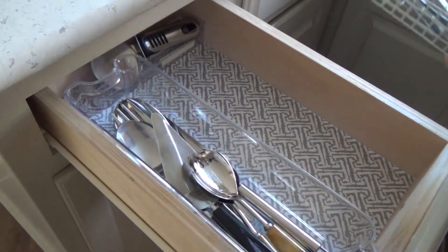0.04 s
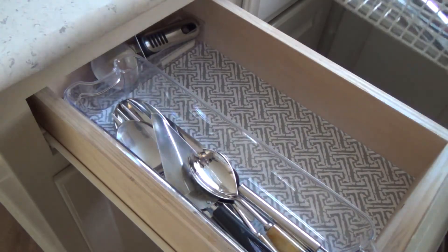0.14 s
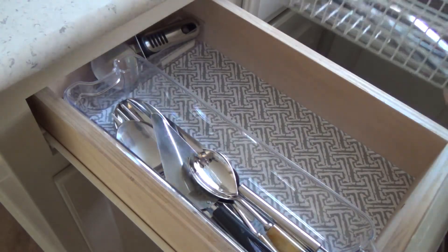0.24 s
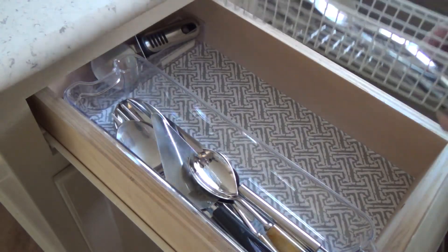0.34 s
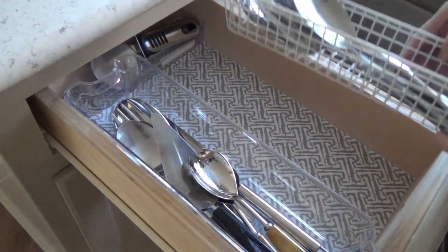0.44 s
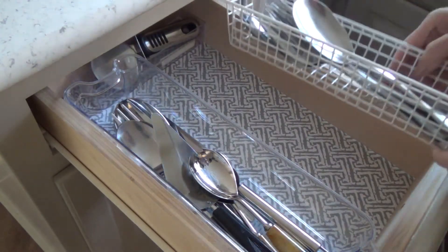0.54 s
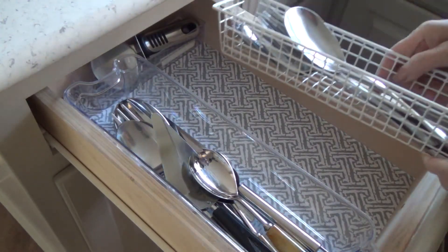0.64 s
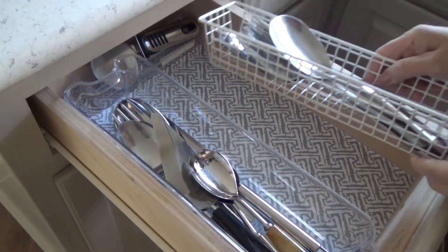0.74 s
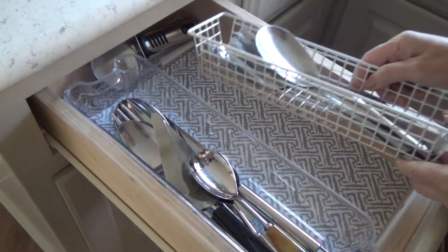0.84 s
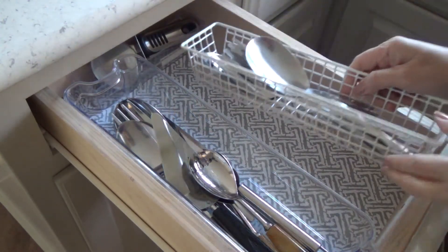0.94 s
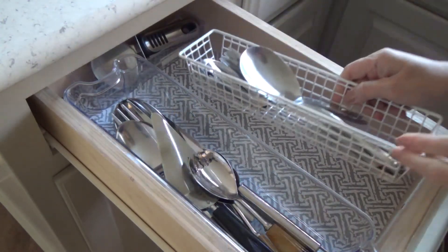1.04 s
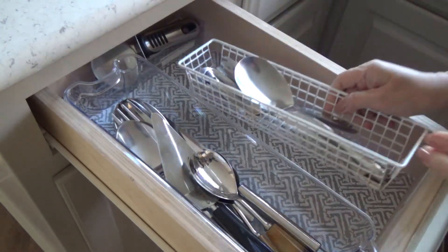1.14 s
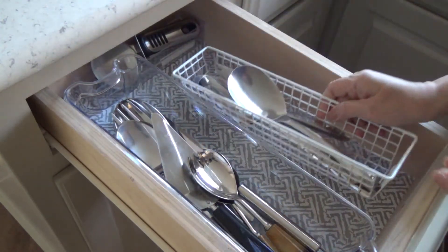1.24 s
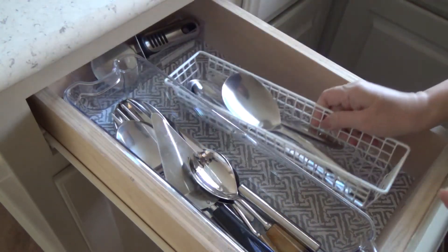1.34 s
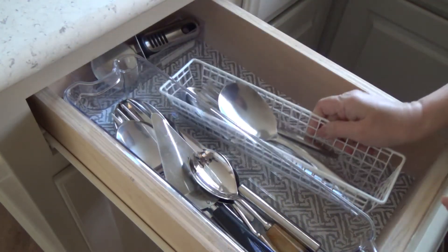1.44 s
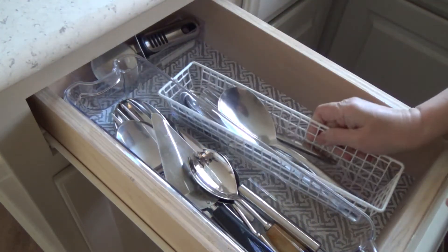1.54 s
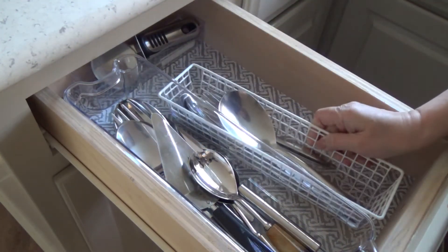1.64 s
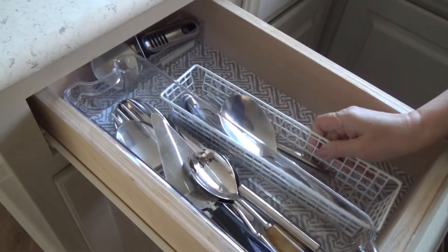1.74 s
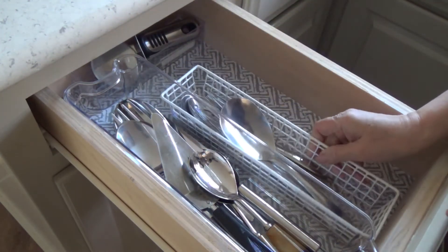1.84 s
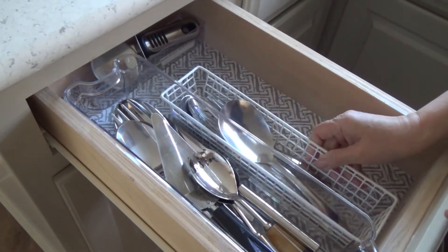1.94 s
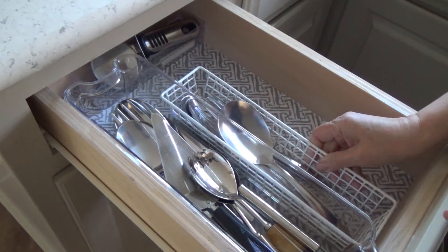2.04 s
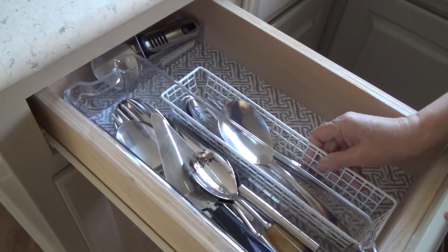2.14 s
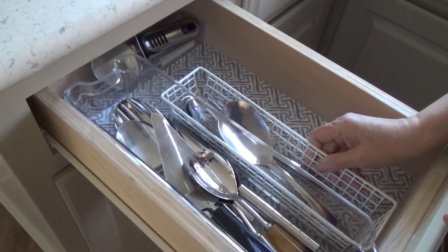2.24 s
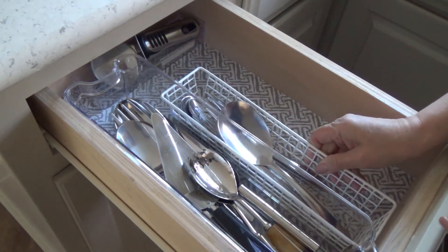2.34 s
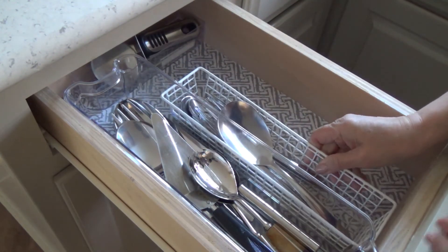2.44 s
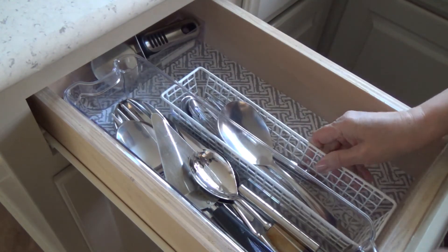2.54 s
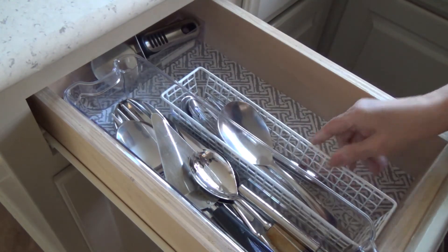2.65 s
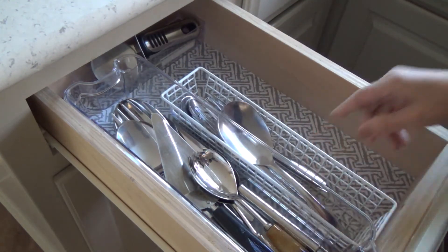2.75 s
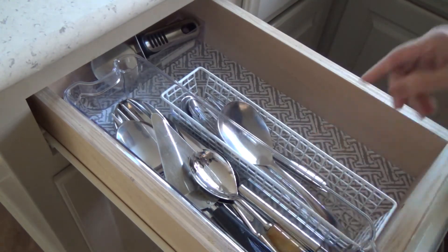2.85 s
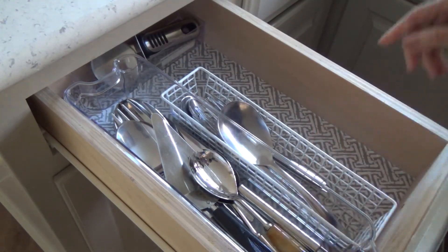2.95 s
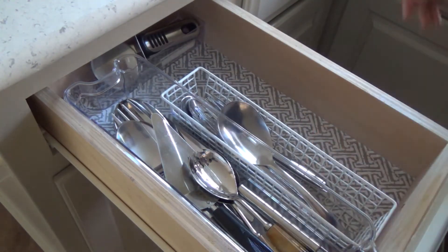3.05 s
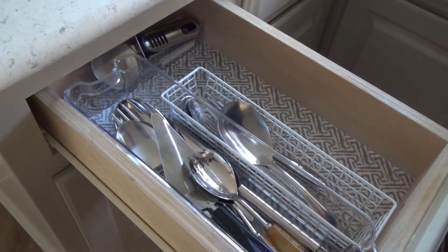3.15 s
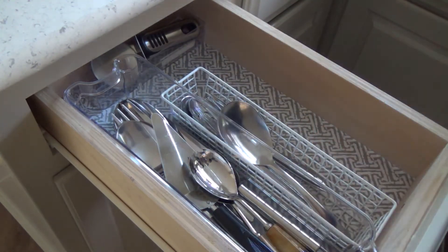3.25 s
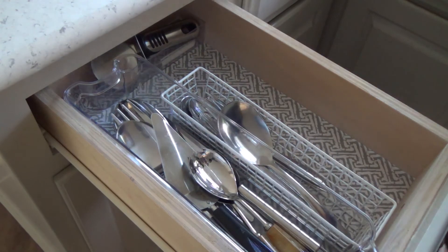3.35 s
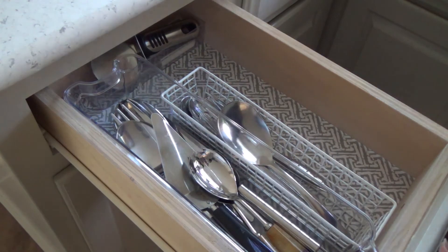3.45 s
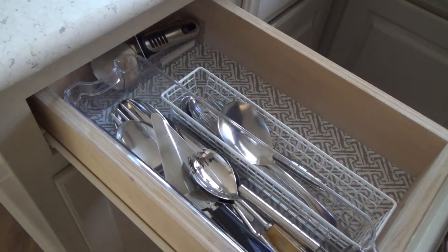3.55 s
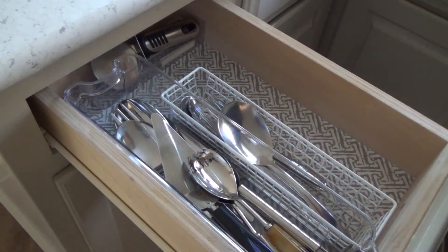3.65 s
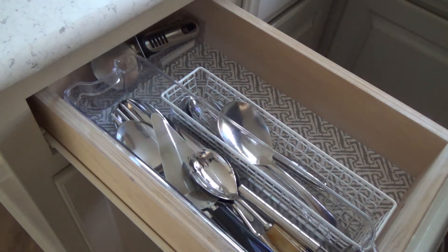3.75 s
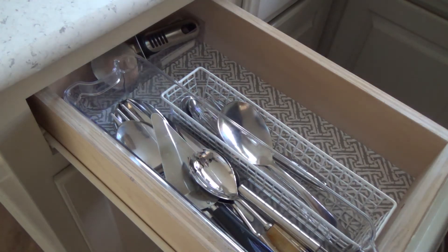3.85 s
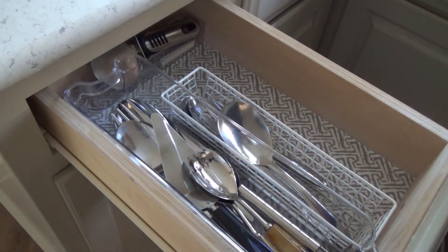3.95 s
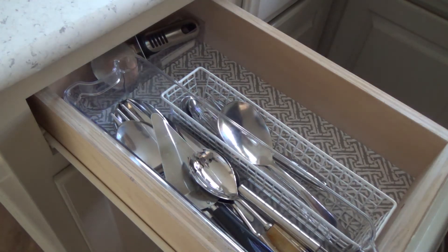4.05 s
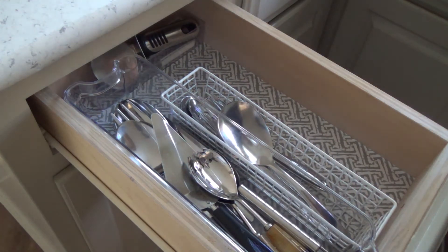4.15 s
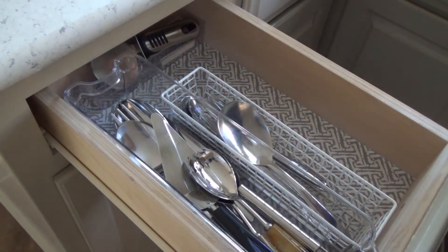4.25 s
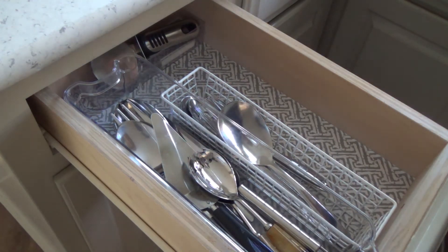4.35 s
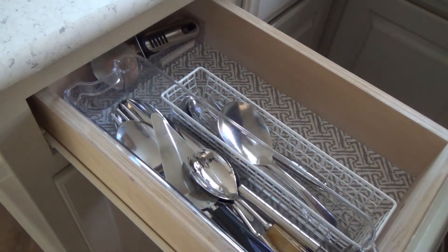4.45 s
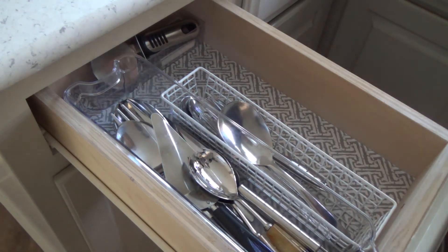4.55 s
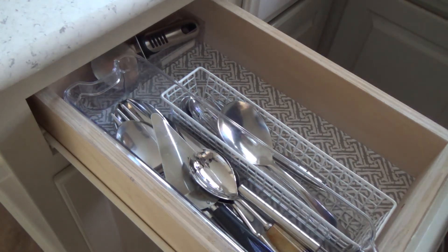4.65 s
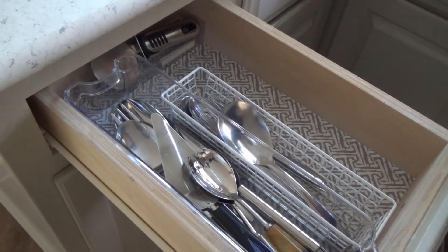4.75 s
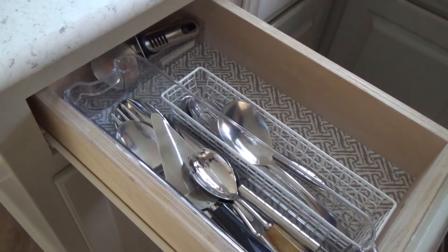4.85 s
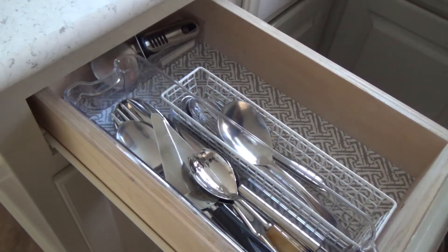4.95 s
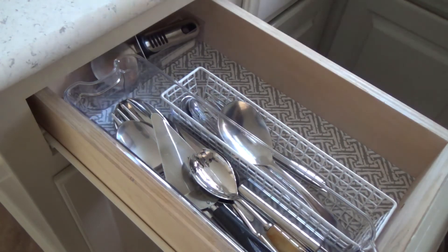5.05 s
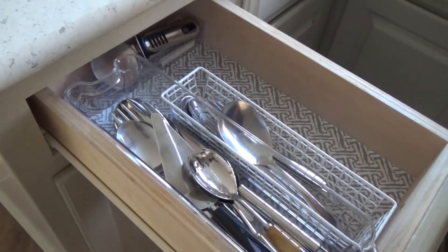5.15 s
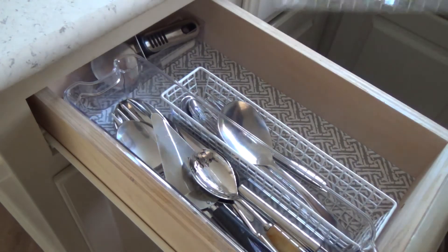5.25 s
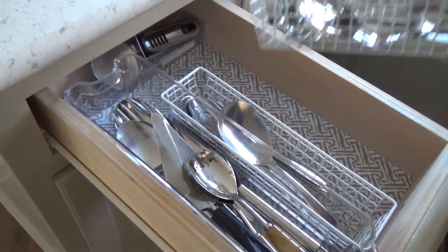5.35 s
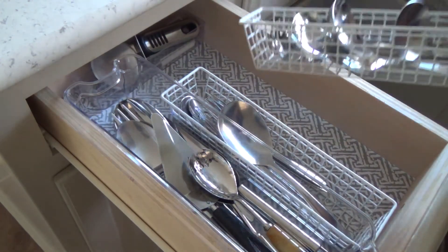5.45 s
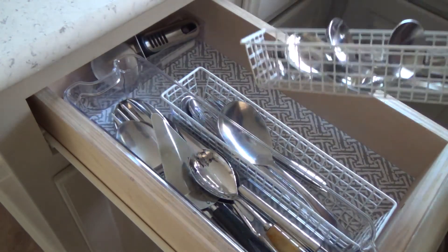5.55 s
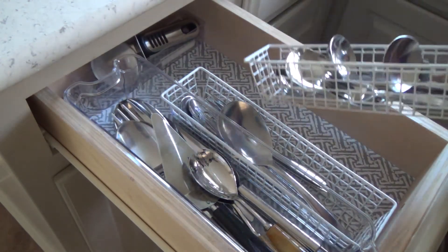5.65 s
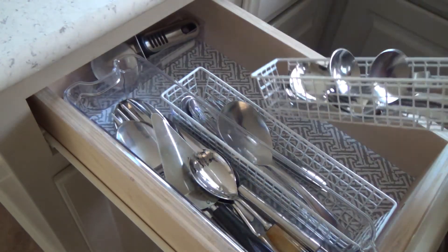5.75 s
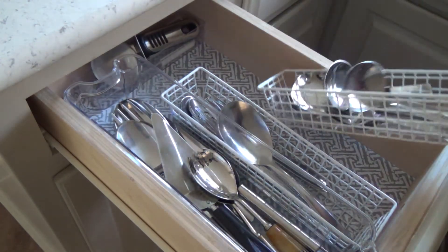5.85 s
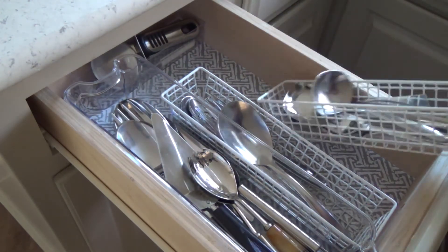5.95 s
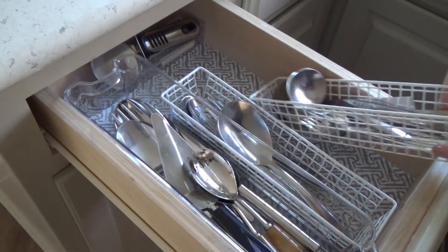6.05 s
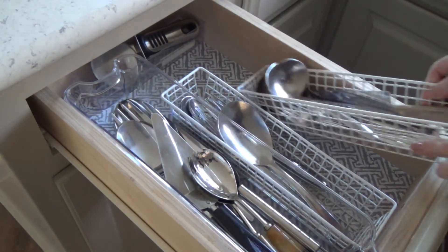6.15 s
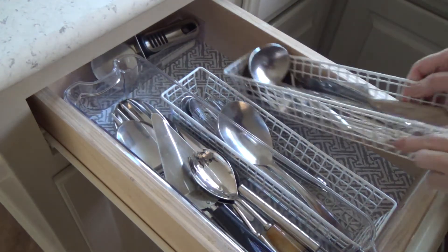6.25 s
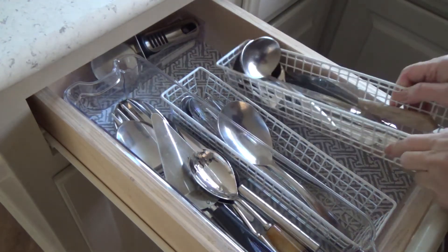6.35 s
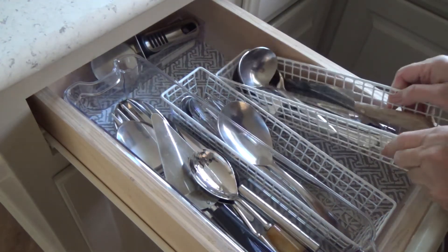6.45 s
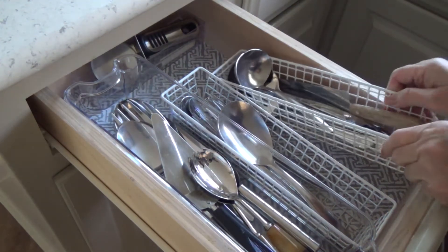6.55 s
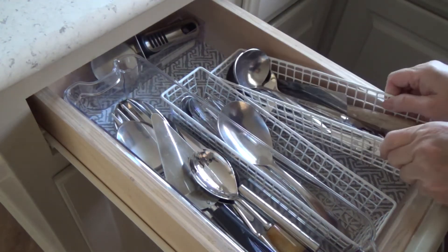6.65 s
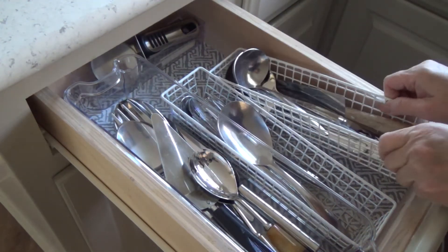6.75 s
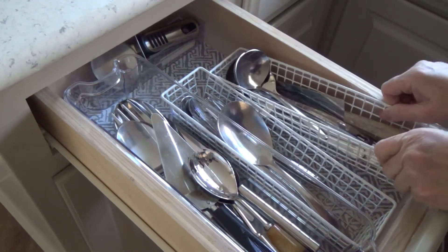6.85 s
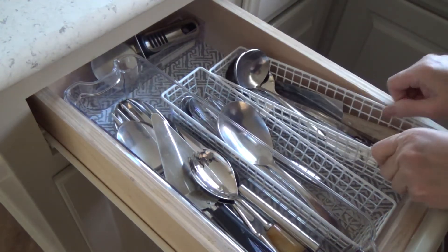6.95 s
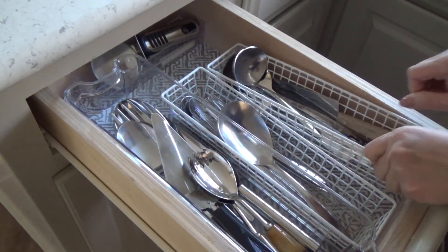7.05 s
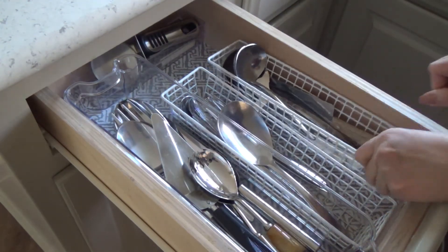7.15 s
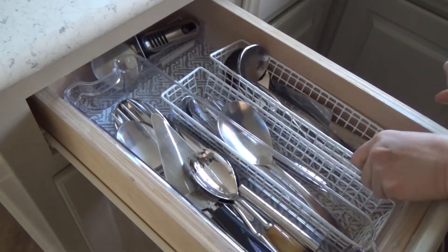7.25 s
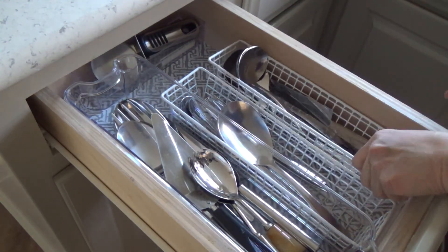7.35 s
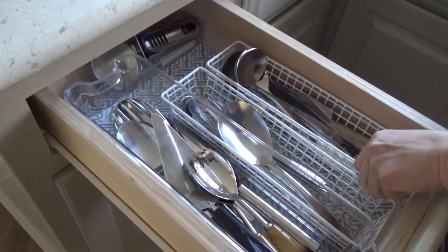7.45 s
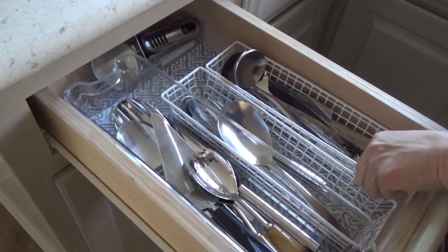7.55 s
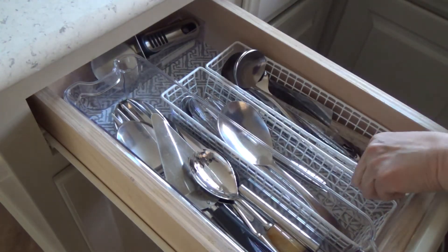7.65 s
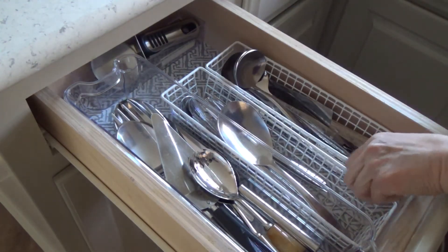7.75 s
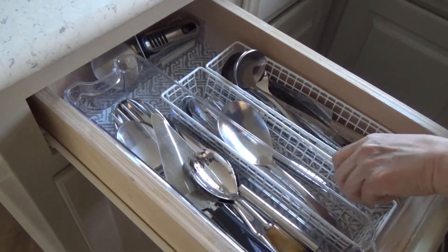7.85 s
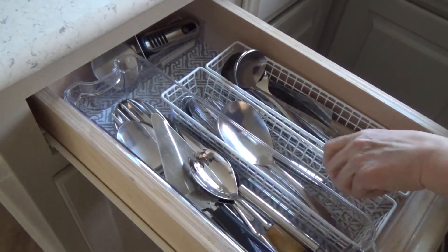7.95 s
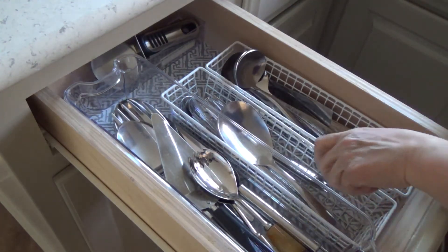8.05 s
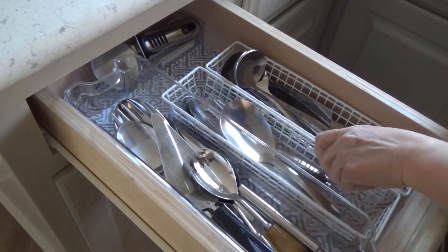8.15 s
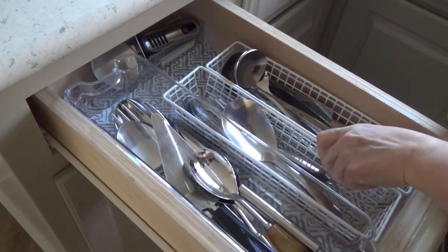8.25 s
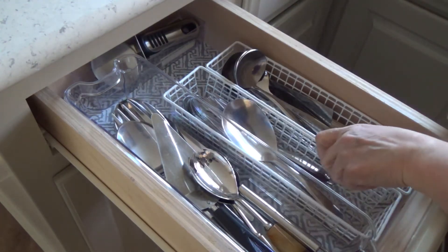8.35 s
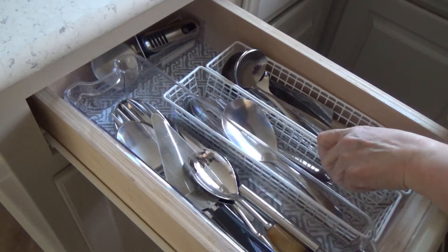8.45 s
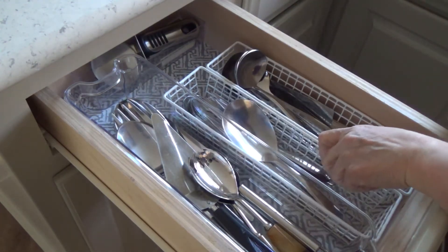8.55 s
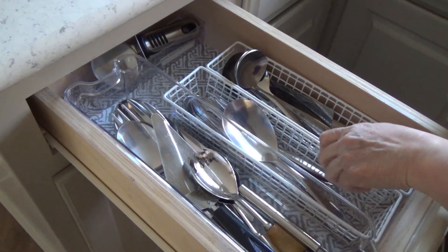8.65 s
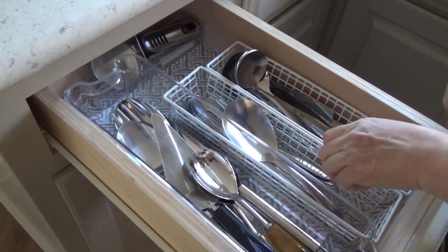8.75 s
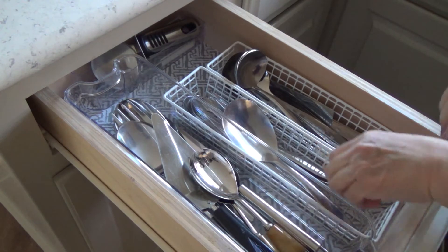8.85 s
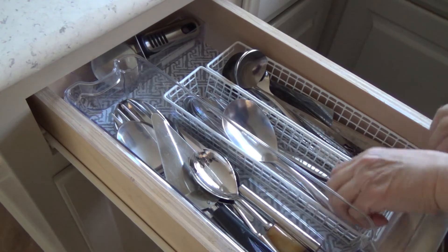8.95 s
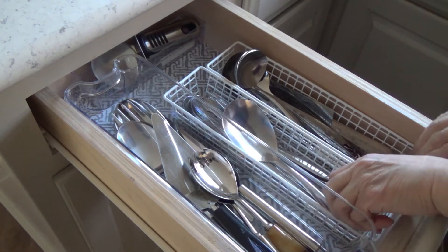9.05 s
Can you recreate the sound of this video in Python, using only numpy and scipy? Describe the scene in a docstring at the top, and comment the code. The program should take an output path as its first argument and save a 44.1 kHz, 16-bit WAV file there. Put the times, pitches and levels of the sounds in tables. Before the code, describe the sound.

Two wire baskets of steel cutlery are set into a wooden drawer with hollow knocks, bright clinks and a rattling metallic slide.

```python
"""Small kitchen: two wire baskets of steel cutlery are set into an open wooden drawer and nudged into place.
Knocks are noise cracks plus damped wood modes; clinks are random contacts driving damped steel modes.
Cutlery slides down the second basket as it tilts; wire scrapes the liner; a cupboard thuds further off.
The room answers with decaying noise tails, over a faint hiss and a thin electrical whine."""
import sys
import numpy as np
from scipy import signal
from scipy.fft import rfft, irfft, next_fast_len
from scipy.io import wavfile

SR = 44100
rng = np.random.default_rng(int(sys.argv[2]) if len(sys.argv) > 2 else 0)


def wrap_up_sound(samples):
    """Save the sound to the file named by the first command line argument, as 16-bit audio."""
    columns = np.atleast_2d(samples).T
    # keep every value between -1 and 1, then stretch to whole-number steps
    tamed = np.clip(columns, -1, 1)
    steps = np.round(tamed * 32767).astype(np.int16)
    wavfile.write(sys.argv[1], SR, steps)


N = 400869
SPAN = 32768  # samples in one short sound
MEDIUM_DB = -25  # contact strength at which the *_PER_DB rules start from their base value


def amp(db):
    """Decibels to gain."""
    return 10 ** (np.asarray(db) / 20)


def unit(x):
    """Scale to rms 1."""
    return x / np.sqrt(np.mean(x ** 2) + 1e-20)


def unit_energy(x):
    """Scale to energy 1 along the last axis."""
    return x / np.sqrt(np.sum(x ** 2, axis=-1, keepdims=True) + 1e-20)


def at_level(x, db, length_s):
    """Scale so that the first length_s has this rms level."""
    return x * amp(db) / np.sqrt(np.mean(x[:round(length_s * SR)] ** 2) + 1e-20)


def by_strength(db, value, per_db):
    """Property that changes linearly with contact strength in dB."""
    return value + per_db * (db - MEDIUM_DB)


def along(points, hz):
    """Interpolate (Hz, value) points on a log frequency axis."""
    f, v = np.transpose(points)
    return np.interp(np.log(hz + 1), np.log(f), v)


def age():
    """Seconds since the start of one short sound."""
    return np.arange(SPAN) / SR


def fade(t60_s):
    """Exponential decay by 60 dB in t60_s."""
    return np.exp(-np.log(1000) * age() / max(t60_s, 1e-3))


def burst(length_s, settle_s):
    """Full strength for length_s, then a 60 dB decay in settle_s."""
    return np.exp(-np.log(1000) * np.maximum(age() - length_s, 0) / max(settle_s, 1e-3))


def add(track, s, sound):
    """Mix a sound in at time s."""
    part = track[round(s * SR):][:len(sound)]
    part += sound[:len(part)]


def coloured(x, points):
    """Minimum-phase filter, via the folded cepstrum, with the gain of (Hz, dB) points."""
    n = x.shape[-1]
    m = 2 * next_fast_len(n // 2 + 2048)
    gain = amp(along(points, np.fft.rfftfreq(m, 1 / SR)))
    cepstrum = irfft(np.log(gain))
    cepstrum[1:m // 2] *= 2
    cepstrum[m // 2 + 1:] = 0
    return irfft(rfft(x, m) * np.exp(rfft(cepstrum)), m)[..., :n]


def ringing(modes, detune=0):
    """One damped sine per mode, its energy set by its dB; detune is the random relative pitch spread."""
    rings = []
    for hz, db, t60_s in modes:
        mode_hz = hz * (1 + detune * rng.standard_normal())
        sine = np.sin(2 * np.pi * mode_hz * age())
        rings.append(amp(db) * unit_energy(sine * fade(t60_s)))
    return np.array(rings)


def struck(rings, scatter_db):
    """Each contact point drives the modes with other strengths and signs."""
    strengths = amp(scatter_db * rng.standard_normal(len(rings)))
    signs = rng.choice([-1, 1], len(rings))
    return unit_energy((strengths * signs) @ rings)


def contacts(rate_hz, spread_db, size):
    """Random tiny collisions of mean rate rate_hz, scaled to rms 1."""
    hits = rng.random(size) < rate_hz / SR
    strengths = amp(spread_db * rng.standard_normal(size))
    return unit(hits * strengths * rng.choice([-1, 1], size))


def ports(mid, other, width):
    """Diffuse stereo at two close ports: other, filtered by width, is the side signal."""
    side = coloured(other, width)
    return np.array([mid + side, mid - side])


# hiss spectrum: (frequency [Hz], relative density [dB per Hz])
HISS = [(20, -17.5), (50, -3), (110, 2), (300, 3.5), (500, -1), (1000, -1.5), (2000, -5), (4000, -7.5),
        (8000, -10), (14000, -11.5)]
# hiss stereo width: (frequency [Hz], side re mid [dB])
HISS_WIDTH = [(60, 0), (180, -7), (550, -8.5), (1650, -18.5), (4970, -30.5), (15000, -24.5)]


def background(hiss_db=-58.0, whine_db=-58.5, whine_hz=15735, throb_hz=13):
    """Steady filtered noise and a high sine whose level throbs."""
    t = np.arange(N) / SR
    hiss = unit(ports(*coloured(rng.standard_normal((2, N)), HISS), HISS_WIDTH))
    tone = np.sqrt(2) * np.sin(2 * np.pi * whine_hz * t)
    throb = 1 - .35 * np.cos(2 * np.pi * throb_hz * t)
    return amp(hiss_db) * hiss + amp(whine_db) * tone * throb


# reverberation time: (frequency [Hz], t60 [s])
ROOM_DECAY = [(100, 0.45), (260, 0.41), (700, 0.5), (1840, 0.55), (4850, 0.34), (12800, 0.23)]
# reverberation stereo width: (frequency [Hz], side re mid [dB])
ROOM_WIDTH = [(30, -26), (70, -9), (130, -8.5), (400, -27.5), (1500, -41), (10000, -62)]


def kitchen(x, delay_s=.005, build_s=0.0068, count=14):
    """Noise tails build up after the direct sound and die fastest in the treble; redrawn for each time slice."""
    wet = np.zeros((2, N + SPAN))
    for part in np.array_split(np.arange(N), count):
        hz, t, z = signal.stft(rng.standard_normal((2, SPAN)), SR, nperseg=256)
        decay = np.exp(-np.log(1000) * t / along(ROOM_DECAY, hz)[:, None])
        tail = signal.istft(z * decay, SR, nperseg=256)[1][:, :SPAN]
        tail = unit_energy(tail * np.clip((age() - delay_s) / build_s, 0, 1))
        answer = signal.fftconvolve(x[None, part], tail, axes=1)
        wet[:, part[0]:part[0] + answer.shape[1]] += answer
    return ports(*wet[:, :N], ROOM_WIDTH)


# cupboard bumped further off: (time [s], level [dB])
THUDS = [(3.992, -33), (4.321, -57)]
# cupboard panel spectrum: (frequency [Hz], gain [dB])
CUPBOARD = [(50, -32), (110, -4), (250, -2), (450, 0), (700, -4), (1150, -8), (1900, -20), (3000, -28),
            (6000, -48), (12000, -80)]


def cupboard(rise_s=.002, ring_t60_s=.09, head_s=.02):
    """Dull wooden thud: decaying noise with the treble filtered off."""
    track = np.zeros(N)
    for s, db in THUDS:
        panel = rng.standard_normal(SPAN) * fade(ring_t60_s) * (1 - np.exp(-age() / rise_s))
        add(track, s, at_level(coloured(panel, CUPBOARD), db, head_s))
    return track


# wire dragged over the drawer liner: (time [s], level [dB], length [s])
SCRAPES = [(1.28, -51, .04), (1.63, -46, .07), (5.928, -37, .016), (6.42, -42, .012), (6.58, -39, .04),
           (6.916, -53, .036), (7.28, -38, .022), (8.063, -51.5, .06), (8.175, -44.5, .055)]
DRAG_RISE_SHARE, DRAG_SETTLE_S = .3, .22  # rise as a share of drag length
# wire shudders under the thrown load
SHUDDER_DELAY_S, SHUDDER_RISE_S, SHUDDER_S, SHUDDER_SETTLE_S = .01, .002, .02, .38
SHUDDER_DB, SHUDDER_PER_DB = -37.5, 1.5


def scrapes(rings):
    """Dragged or shuddering wire catches and slips on the liner; the slips drive the drawer bottom."""
    track = np.zeros(N)
    drags = [(s, db, DRAG_RISE_SHARE * length_s, length_s, DRAG_SETTLE_S) for s, db, length_s in SCRAPES]
    shudders = []
    for s, db, _ in throws():
        level_db = by_strength(db, SHUDDER_DB, SHUDDER_PER_DB)
        shudders.append((s + SHUDDER_DELAY_S, level_db, SHUDDER_RISE_S, SHUDDER_S, SHUDDER_SETTLE_S))
    rub_tone = [(70, -25.5), (190, -3), (1200, -2), (2500, -9), (5000, -11.5), (12000, -14)]  # (Hz, dB)
    for s, db, rise_s, length_s, settle_s in shudders + drags:
        envelope = burst(length_s, settle_s) * np.minimum(age() / rise_s, 1)
        slips = contacts(rate_hz=900, spread_db=2.5, size=SPAN) * envelope
        dull_noise = unit_energy(rng.standard_normal(SPAN) * fade(0.058))
        board = amp(-13) * struck(rings, scatter_db=1.5) + dull_noise
        rub = coloured(signal.fftconvolve(slips, board)[:SPAN], rub_tone)
        add(track, s, at_level(rub, db, length_s + 0.03))
    return track


# spoon and fork modes, damped by lying on each other: (frequency [Hz], relative energy [dB], t60 [s])
STEEL = [(2712, -5, 0.1), (2920, -9, 0.14), (3800, 0, 0.12), (4360, -23, 0.063), (4540, -1, 0.027),
         (4780, -1.5, 0.135), (5240, -5, 0.2), (6460, -13, 0.1184), (6930, -3.5, 0.14), (7410, -3, 0.18),
         (7730, 6.5, 0.173), (8390, 2, 0.22), (9270, -3, 0.088), (9570, 3.5, .1), (10200, -4, 0.075),
         (9870, 6, 0.053), (10700, 2, 0.22), (11200, -13.5, 0.104), (11400, -2.5, 0.082), (11440, 5, .2),
         (11600, 10, 0.09), (12393, -20, .18), (12760, 7, .14), (12370, -4, 0.037), (13500, -11, .14),
         (13550, 11, .08), (14560, 2.5, .09)]


def steel_pieces(count=6):
    """Like pieces whose modes differ a little in pitch."""
    return [ringing(STEEL, detune=.003) for _ in range(count)]


# spectrum of the crowded short modes: (frequency [Hz], gain [dB])
CLASH = [(70, -58), (400, -21), (1500, -17), (2300, -13.5), (2800, -5), (4000, -8), (6000, -3),
         (8700, -3.5), (9800, 2), (13000, 1.5), (14000, -2), (16000, -7.5)]


def utensil(pieces, ring_db=-4, tick_db=-8, clash_t60_s=0.062):
    """One piece's answer to a contact: a tick, a crowd of quickly damped modes and a few clear ones."""
    crowd = unit_energy(rng.standard_normal(SPAN) * fade(clash_t60_s))
    tick = amp(tick_db) * unit_energy(rng.standard_normal(SPAN) * fade(0.0084))
    clear = struck(pieces[rng.integers(len(pieces))], scatter_db=3)
    return unit_energy(coloured(crowd + tick, CLASH)) + amp(ring_db) * clear


def bowls(x, db):
    """Contacts also wake the low modes of the spoon bowls; thin steel radiates no bass."""
    return coloured(x, [(60, db - 31), (600, db), (2000, db), (4500, db), (9000, 0)])


# cutlery sliding down its basket: (time [s], level [dB])
SLIDE = [(5.53, -55), (5.63, -36), (5.66, -58), (5.81, -40), (5.83, -29), (5.888, -31), (5.9, -19),
         (6.16, -19.5), (6.28, -23.5), (6.36, -47)]


def slide(pieces, bowl_db=2.5, bowl_per_db=-.55, count=40):
    """Pieces skid in turn over mesh and neighbours, each ringing briefly; weaker sliding is duller."""
    s, db = np.transpose(SLIDE)
    step_s = (s[-1] - s[0]) / count
    skid = np.sin(np.pi * np.minimum(age() / (2 * step_s), 1))  # lasts two steps, so skids overlap
    track = np.zeros(N)
    for start in s[0] + step_s * np.arange(count - 1):
        hits = unit_energy(skid * contacts(rate_hz=380, spread_db=4, size=SPAN))
        force = hits * np.sqrt(step_s * SR) * amp(np.interp(start + age(), s, db))
        tone_db = by_strength(np.interp(start + step_s, s, db), bowl_db, bowl_per_db)
        piece = bowls(utensil(pieces, ring_db=-5.5, clash_t60_s=0.1), tone_db)
        add(track, start, signal.fftconvolve(force, unit_energy(piece))[:SPAN])
    return track


SETTLE_S, SETTLE_PER_DB = .072, .17  # harder jolts take longer to settle; slope in dB of time per dB
CHATTER_S, SETTLE_POWER = .01, .52  # so do those that chatter longer than CHATTER_S


def settling(db, length_s):
    """Seconds that the cutlery takes to come to rest."""
    return SETTLE_S * (length_s / CHATTER_S) ** SETTLE_POWER * amp(by_strength(db, 0, SETTLE_PER_DB))


# pieces clink as a basket is moved:
# (time [s], level [dB], chatter [s], leading tone [Hz], tone re clatter before LEAD_LIFT_DB [dB])
CLINKS = [(1.008, -45, .0045, 11600, -15), (1.038, -41.5, .008, 12400, -8), (1.05, -23.5, .0015, 11610, -5),
          (1.052, -38, .0012, 4860, 0), (1.099, -29, .012, 11560, -8), (3.898, -50, .002, 10700, -2),
          (3.968, -50.5, .002, 10400, -5), (5.002, -53, .002, 13500, -15), (5.364, -54, .002, 2950, -8),
          (5.595, -32.5, .006, 12900, -16), (5.618, -32, .007, 4600, -9), (5.665, -33, .002, 11000, -10),
          (5.734, -43, .035, 4930, -13), (5.897, -27, .014, 9300, 14), (5.979, -31, .005, 4500, -4),
          (6.018, -25, .002, 4580, -8), (6.084, -29, .025, 9800, 8), (6.198, -24, .007, 11450, -7),
          (6.241, -21, .018, 12400, -7), (6.305, -35, .003, 2950, -6), (6.376, -37, .002, 11750, -3),
          (6.4, -32.5, .0015, 11750, -18), (6.431, -19, .008, 3050, -19), (6.438, -20, .008, 2776, -17),
          (6.612, -17.5, .005, 12760, -2), (6.619, -27, .002, 5100, -8), (6.936, -36, .004, 12900, -2.5),
          (7.127, -50.5, .003, 12700, -2), (7.276, -18, .006, 11650, -10), (7.303, -28, .01, 13000, -7),
          (7.583, -28.5, .0012, 7350, -13), (7.643, -47, .028, 7350, -11.5), (8.118, -53, .003, 10200, -10),
          (8.517, -52, .009, 10200, -9), (8.709, -40, .004, 7400, -12), (9.03, -50, .015, 10200, -8)]
# thrown cutlery lands just after the knock; its tone level is also before LEAD_LIFT_DB
THROW_DELAY_S, THROW_HZ, THROW_TONE_DB = .0055, 11620, -21
LEAD_LIFT_DB = 4.5
BOWL_DB, BOWL_PER_DB = -2, -.3  # hard clinks are mostly treble, light ones show the spoon bowls


def jolts(pieces, count=3):
    """A jolt, from the hand or a knock, throws a few pieces against each other; they chatter and settle."""
    track = np.zeros(N)
    thrown = [(s + THROW_DELAY_S, db, length_s, THROW_HZ, THROW_TONE_DB) for s, db, length_s in throws()]
    for s, db, length_s, lead_hz, lead_db in thrown + CLINKS:
        activity = burst(length_s, settling(db, length_s))
        forces = [contacts(rate_hz=600, spread_db=2, size=SPAN) * activity for _ in range(count)]
        forces[0][0] += 18  # strong opening contact
        clatter = sum(signal.fftconvolve(force, utensil(pieces))[:SPAN] for force in forces)
        clatter = bowls(clatter, by_strength(db, BOWL_DB, BOWL_PER_DB))
        # the piece that is hit rings with its own strongest mode
        drive = signal.fftconvolve(activity ** 2, fade(0.037) ** 2)[:SPAN]
        lead = np.sqrt(np.abs(drive)) * np.sin(2 * np.pi * lead_hz * age())
        head_s = length_s + 0.011
        sound = at_level(clatter, 0, head_s) + at_level(lead, lead_db + LEAD_LIFT_DB, head_s)
        add(track, s, at_level(sound, db, head_s))
    return track


# modes of a spoon that lands free: (frequency [Hz], starting amplitude [dB], t60 [s])
FREE = [(5329, -60, .7), (6810, -53, 1), (11340, -44, 1.1), (11560, -48, .3)]


def free_spoon(at_s=8.29):
    """One undamped spoon sings on as a few slowly fading sines."""
    track = np.zeros(N)
    for hz, db, t60_s in FREE:
        add(track, at_s, amp(db) * np.sin(2 * np.pi * hz * age()) * fade(t60_s))
    return track


# basket knocks on the wood: (time [s], level before KNOCK_GAIN_DB [dB], contact hardness [dB],
# frequency favoured by the struck spot [Hz], thrown cutlery level [dB], its chatter [s], 0 = none thrown)
KNOCKS = [(1.512, -20.5, -15, 165, -41.5, .021), (1.664, -24, 1, 775, -28, .012),
          (1.851, -18, -5.5, 1180, -18.5, .026), (1.982, -48, 2, 1200, 0, 0), (2.353, -36, 4.5, 1760, 0, 0),
          (5.813, -15, -14, 390, -35, .05), (6.065, -25.5, -4, 376, 0, 0),
          (6.493, -16.5, -4.5, 1280, -18.5, .06), (7.263, -27, -10, 283, -35, .02),
          (7.357, -45, -10, 1000, 0, 0), (7.504, -49, -20, 643, 0, 0), (7.570, -27.5, -5.5, 1313, 0, 0),
          (7.678, -47, -11, 260, 0, 0), (7.838, -42, 0, 800, 0, 0), (8.234, -18.5, -1, 387, -18.5, .042),
          (8.692, -43, -6, 503, 0, 0), (9.042, -46.5, -3, 675, 0, 0)]
# drawer bottom and walls: (frequency [Hz], relative energy [dB], t60 [s])
WOOD = [(163.8, -4.5, 0.12), (215, -7.5, 0.21), (282.3, 0.5, 0.16), (387, 6, 0.033), (433.3, -7, 0.13),
        (515, 1, 0.13), (628, 4, 0.0837), (716, -4.5, 0.071), (798, -1.5, 0.025), (998, 2.5, 0.013),
        (1225, 2, .035), (1380, 2, 0.026), (1560, 2.5, 0.019), (1930, 1, 0.021)]
KNOCK_GAIN_DB = 35.0  # applied to a blow of unit energy
SNAP_DB, SNAP_PER_DB = 4.5, .4  # stronger blows are briefer, so they snap more
ROOM_DB, ROOM_PER_DB = -3.2, -.05  # light knocks are heard more through the room
THUD_DB, THUD_PER_HARD_DB = -14.5, -.4  # harder contacts thud less
DEEP_DB, DEEP_PER_DB = -15, .5  # blows above MEDIUM_DB move the whole drawer and add deep bass


def throws():
    """(time [s], cutlery level [dB], chatter [s]) of the knocks that throw the cutlery up."""
    return [(s, db, length_s) for s, *_, db, length_s in KNOCKS if length_s > 0]


def knocks(rings, favour_db=11, favour_octaves=0.12, ring_db=-6, spread_s=0.00074):
    """Basket frame hits wood: soft contacts thud, hard ones clack. Returns direct sound and room send."""
    track, send = np.zeros(N), np.zeros(N)
    for s, db, hard_db, spot_hz, *_ in KNOCKS:
        snap_db = hard_db + by_strength(db, SNAP_DB, SNAP_PER_DB)
        crack = unit_energy(rng.standard_normal(SPAN) * (fade(0.032) + 1.06 * fade(0.11)))
        # modes with a crest at the struck spot take more of the blow
        octaves_off = np.log2(np.array(WOOD)[:, :1] / spot_hz)
        nearness = np.exp(-(octaves_off / favour_octaves) ** 2)
        board = struck(rings * amp(favour_db * nearness), scatter_db=1.5)
        # a soft contact rings the board more; the blow takes a moment to spread
        softness = amp(np.clip(-snap_db, 0, 15) / 2)
        onset = 1 - np.exp(-age() / spread_s)
        blow = unit_energy((amp(ring_db) * softness * board + crack) * onset)
        thud_db = THUD_DB + THUD_PER_HARD_DB * hard_db
        deep_db = DEEP_DB + DEEP_PER_DB * max(db - MEDIUM_DB, 0)
        contact = [(25, deep_db - 46.5), (60, deep_db - 19), (125, deep_db - 1.5),
                   (210, thud_db + 12), (380, thud_db / 2 + 2.5), (700, 0),
                   (1400, hard_db + 3), (2000, (hard_db + snap_db) / 2),
                   (3200, snap_db - 7.5), (6000, snap_db - 19), (14000, snap_db - 39)]
        sound = amp(db + KNOCK_GAIN_DB) * coloured(blow, contact)
        add(track, s, sound)
        add(send, s, amp(by_strength(db, ROOM_DB, ROOM_PER_DB)) * sound)
    return track, send


# stereo lean: (frequency [Hz], left re right [dB])
LEAN = [(60, -9), (250, -7.5), (500, -2), (1000, -0.7), (4000, -1.5), (12000, 0.4)]


def scene():
    """Steel and wood in the kitchen, low notes leaning right, over the background."""
    steel, wood = steel_pieces(), ringing(WOOD)
    thuds, rubs = cupboard(), scrapes(wood)
    cutlery = slide(steel) + jolts(steel) + free_spoon()
    bumps, bumps_send = knocks(wood)
    room_send = amp(-7.5) * thuds + amp(-13.5) * cutlery + amp(-11.5) * (bumps_send + rubs)
    left, right = cutlery + bumps + rubs + thuds + kitchen(room_send)
    lean = np.array(LEAN)
    leaned = np.array([coloured(left, lean * [1, .5]), coloured(right, lean * [1, -.5])])
    return leaned + background()


def record(dry, top=0.63, top_hz=15850):
    """Soft saturation rounds off peaks towards top; a steep low-pass removes all from top_hz up."""
    held = dry / (1 + np.abs(dry / top) ** 4) ** (1 / 4)
    m = next_fast_len(N + SPAN)
    return irfft(rfft(held, m) * (np.fft.rfftfreq(m, 1 / SR) < top_hz), m)[:, :N]


dry = scene()
out = record(dry)
wrap_up_sound(out)
```